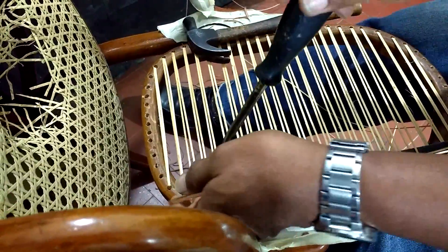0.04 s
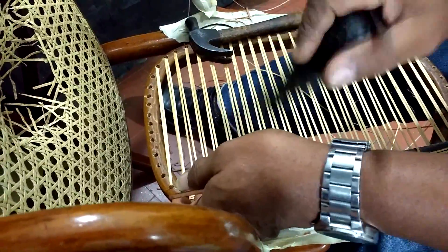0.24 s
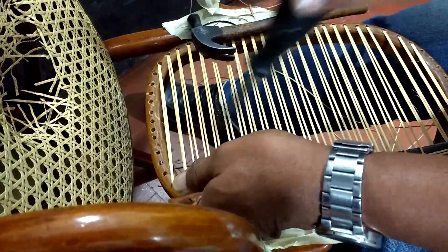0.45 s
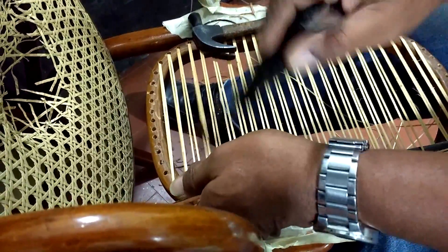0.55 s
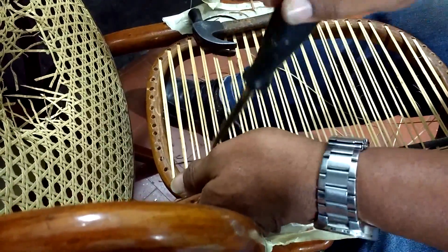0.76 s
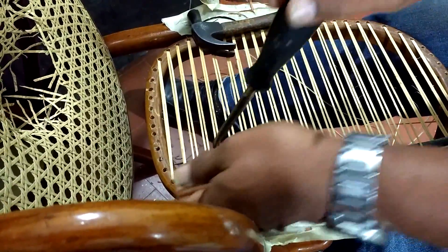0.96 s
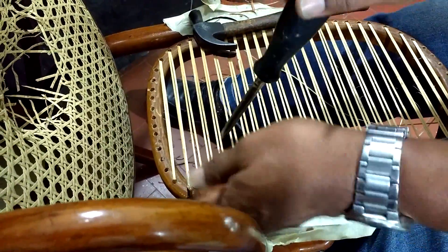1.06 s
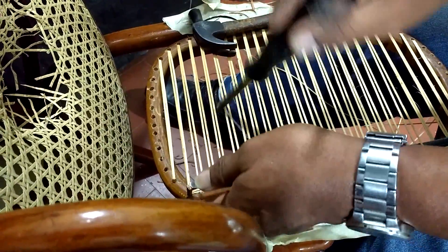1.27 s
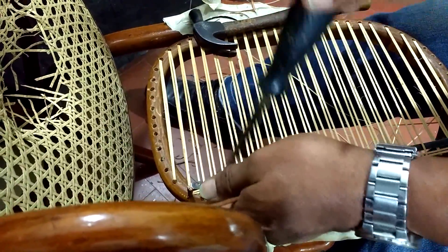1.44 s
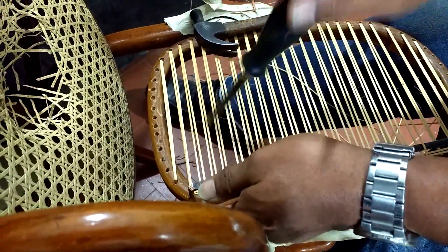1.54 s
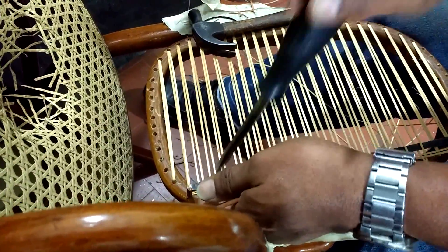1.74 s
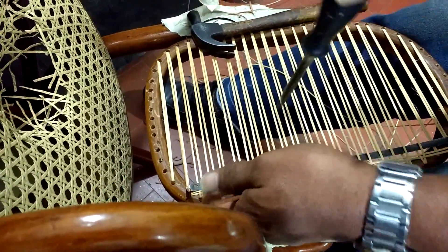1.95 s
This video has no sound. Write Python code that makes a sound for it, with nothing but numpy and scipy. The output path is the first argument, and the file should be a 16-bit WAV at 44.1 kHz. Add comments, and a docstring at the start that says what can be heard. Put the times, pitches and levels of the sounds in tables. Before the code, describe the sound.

Four close, sharp screwdriver jabs crack against a wooden cane chair in a small room.

```python
"""Screwdriver jabs on a cane chair

A screwdriver hits a wooden chair frame four times, close by in a small room. Each jab grazes
the cane, cracks on the wood, rings the tool briefly and sets the frame thudding. Cane strands
rustle between jabs over a low background with a faint hum. The stereo sound is wide and hollow."""
import sys
import numpy as np
from scipy import signal
from scipy.fft import rfft, irfft, next_fast_len
from scipy.io import wavfile
from scipy.ndimage import uniform_filter1d

SR = 44100
rng = np.random.default_rng(int(sys.argv[2]) if len(sys.argv) > 2 else 0)


def master_out(mix):
    """Clip the mix to full scale and print it as 16-bit PCM to the path in sys.argv[1]."""
    frames = np.transpose(np.atleast_2d(mix))
    ceiling = np.clip(frames, -1, 1)
    pcm = np.round(ceiling * 32767).astype(np.int16)
    wavfile.write(sys.argv[1], SR, pcm)


N = 88200


def amp(db):
    """Turn decibels into a number to multiply by."""
    return 10 ** (np.asarray(db) / 20)


def unit(x):
    """Scale a signal to an average strength (rms) of 1."""
    return x / np.sqrt(np.mean(x ** 2))


def curve(points, size):
    """Join (frequency, value) points into a line across the whole spectrum."""
    hz, value = np.array(points).T
    return np.interp(np.log(np.fft.rfftfreq(size, 1 / SR) + 1), np.log(hz), value)


def colour(x, points, keep_power=True, size=4096):
    """Shape the tone along (f/Hz, level/dB) points; keep_power leaves white noise equally strong."""
    gain = amp(curve(points, size))
    cepstrum = irfft(np.log(unit(gain) if keep_power else gain))
    cepstrum[1:size // 2] *= 2  # fold it so the filter never sounds ahead of its input
    cepstrum[size // 2 + 1:] = 0
    response = irfft(np.exp(rfft(cepstrum)))[:size // 2]
    return signal.fftconvolve(x, response)[:len(x)]


def noise(size=N):
    """White noise: all frequencies equally strong."""
    return rng.standard_normal(size)


def wander(rate):
    """A random drift that turns about `rate` times a second."""
    hold = int(SR / rate)
    steps = np.repeat(noise(N // hold + 1), hold)
    return unit(uniform_filter1d(steps, hold)[:N])


def decay(age, t60):
    """Silence before age 0, then a fade of 60 dB every t60 seconds."""
    return (age >= 0) * np.exp(-np.log(1000) * np.maximum(age, 0) / t60)


def ring(age, tones, scatter, tilt_db=0):
    """A struck object's fading tones, a little off pitch each time; tilt_db is per octave."""
    out = np.zeros(len(age))
    middle_hz = tones[len(tones) // 2][0]
    for k, (hz, db, t60) in enumerate(tones):
        detune = 1 + scatter * rng.standard_normal()
        level = amp(db + tilt_db * np.log2(hz / middle_hz))
        out += (-1) ** k * level * decay(age, t60) * np.sin(2 * np.pi * hz * detune * age)
    return out


# How much the two sides differ: f/Hz, level/dB
WIDTH = [(50, -6.5), (150, -8), (400, -3), (1200, -13.5), (2000, -4), (2500, -23), (3200, 2), (5000, -8),
         (15000, -2.5)]
def stereo_noise(tone, envelope=1, size=N):
    """One noise shared by both sides, plus another added left and subtracted right."""
    shared, different = (colour(noise(size) * envelope, tone) for _ in range(2))
    return shared + np.array([[1], [-1]]) * colour(different, WIDTH, keep_power=False)


# Tone of the hiss: f/Hz, level/dB
HISS_TONE = [(200, -11), (1500, -0.5), (2500, -12), (5000, -11.5), (14000, -9.5), (16000, -32.5)]
def hiss(level_db=-77.5):
    """A faint, steady microphone hiss."""
    return amp(level_db) * stereo_noise(HISS_TONE)


# Tone of the distant noise: f/Hz, level/dB
BACKGROUND_TONE = [(25, -23.5), (60, -20), (115, -6.5), (180, -8), (260, -2.5), (320, -11.5), (450, -7),
                   (800, -12), (1600, -20.5), (2300, -33), (3300, -31), (5000, -33), (9000, -35.5),
                   (14000, -41), (16000, -51)]
# Its loudness over time: t/s, level/dB
BACKGROUND_LEVEL = [(0, -45), (0.2, -44.5), (0.33, -46), (0.37, -54.5), (0.52, -62), (0.62, -58.5),
                    (0.8, -58), (1.35, -52.5), (1.56, -54.5), (1.85, -55.5), (2.0, -55)]
def background(t, flicker_db=1.45):
    """A low wash of distant noise, loudest before the first jab."""
    level_db = np.interp(t, *np.array(BACKGROUND_LEVEL).T) + flicker_db * wander(25.2)
    return amp(level_db) * stereo_noise(BACKGROUND_TONE)


# Short hums: start t/s, end t/s, start f/Hz, end f/Hz, level/dB
HUM_NOTES = [(0.04, 0.331, 276, 240.5, -50.5), (0.78, 1.15, 265, 263.5, -54),
             (1.76, 1.896, 246, 241, -53.5), (1.874, 2.05, 418, 431, -57.5)]
def hums(t, fade_s=0.052, waver=0.011):
    """A faint low tone comes and goes, wavering in pitch."""
    out = np.zeros(N)
    for start, end, from_hz, to_hz, db in HUM_NOTES:
        hz = np.interp(t, [start, end], [from_hz, to_hz]) * (1 + waver * wander(45))
        fade = np.clip(np.minimum(t - start, end - t) / fade_s, 0, 1)
        out += amp(db) * fade * np.sqrt(2) * np.sin(2 * np.pi * np.cumsum(hz) / SR)
    return out


# Rustles of the cane: middle t/s, length t/s, level/dB
CANE_RUSTLES = [(0.218, 0.11, -51), (0.317, .035, -41), (0.634, .02, -60), (0.997, 0.047, -67),
                (1.189, .03, -66), (1.284, .06, -62), (1.66, .04, -56.5)]
# Their tone: f/Hz, level/dB
CANE_TONE = [(500, 5), (2000, -10.5), (3200, -11), (4100, 1.5), (5200, -18.5), (9000, -17), (15000, -22)]
def cane(t, grain_db=3):
    """Strands slide over each other in short grainy rustles."""
    swells = sum(amp(db) * np.exp(-2 * np.minimum(((t - when) / length) ** 2, 20))
                 for when, length, db in CANE_RUSTLES)
    grain = unit(amp(grain_db * wander(400)))
    return stereo_noise(CANE_TONE, grain * swells)


# Tone of the echoes: f/Hz, level/dB
ECHO_TONE = [(60, -6), (150, -18), (400, 2.5), (800, 9.5), (1300, 2.5), (1900, -2), (2600, -6), (3600, 4.5),
             (5000, -2.5), (9000, 0), (14000, -12.5), (16000, 0)]
# Which way they lean: f/Hz, left minus right level/dB
ECHO_LEAN = [(100, 4.5), (1000, -0.5), (3500, 0), (4500, -9.5), (7000, -2), (14000, -9.5)]
def room(x, length_s=0.45, rise_s=0.015, early_db=-8.5, late_db=-11.5):
    """Quick echoes off the floor and chair, then the small room's longer fade."""
    t = np.arange(int(length_s * SR)) / SR
    rise = 1 - np.exp(-t / rise_s)
    early = amp(early_db) * unit(rise * decay(t, t60=0.078))
    late = amp(late_db) * unit(rise * decay(t, t60=0.35))
    echoes = stereo_noise(ECHO_TONE, np.hypot(early, late) / np.sqrt(len(t)), len(t))
    sides = []
    for side, sign in zip(echoes, (1, -1)):
        lean = [(hz, sign * db / 2) for hz, db in ECHO_LEAN]
        sides.append(signal.fftconvolve(x, colour(side, lean, keep_power=False))[:N])
    return np.array(sides)


# Tone of the loose joints: f/Hz, level/dB
JOINT_TONE = [(200, -39.5), (500, -11), (800, -3), (1200, -2.5), (1700, -5), (2300, 5.5), (5000, -32.5)]
def joint_clatter(age, rebound_s=0.04):
    """Loose joints clatter at the blow, and again as the chair rocks back once."""
    rocking = decay(age, t60=0.098) + amp(-12) * decay(age - rebound_s, t60=0.05)
    return colour(noise(len(age)) * rocking, JOINT_TONE)


# Ringing tones of the frame: f/Hz, level/dB, fade t/s
FRAME_TONES = [(114.3, -11, 0.34), (128.8, -8.5, 0.26), (168, -12, 0.32), (187.3, -1.5, 0.24),
               (233.7, -2, 0.2), (282, 2.5, .13), (317.7, 3.5, .15), (350, -0.5, 0.056),
               (409.8, -12.5, 0.2), (625, -17, .08), (789, -12.5, 0.12), (857, -3.5, 0.042),
               (896, -3, 0.04), (1170, -9.5, 0.099)]
def frame_thud(age, tilt_db, rise_s=0.0072, sharp=0.07, settle_s=0.013):
    """The thud swells just after the hit; the pressed frame starts high and sags to pitch."""
    elapsed = np.maximum(age, 0)
    swell = 1 - np.exp(-(elapsed / rise_s) ** 2)
    head_start = sharp * settle_s * (1 - np.exp(-elapsed / settle_s))
    return swell * ring(age + head_start, FRAME_TONES, scatter=0.006, tilt_db=tilt_db)


# Ringing tones of the tool on the wood: f/Hz, level/dB, fade t/s
TOOL_TONES = [(1320, -21, 0.035), (1740, -14, 0.015), (2240, -24.5, 0.045), (2636, -4.5, 0.016),
              (3238, -11.5, 0.022), (3670, -14.5, 0.017), (4220, -2, 0.013), (4580, -5.5, 0.016),
              (7200, -27, .02), (10500, -31, .015), (11700, -28.5, 0.005), (13000, -29.5, .015)]
def tool_ring(age):
    """The screwdriver's shaft rings briefly as it lands."""
    return ring(age, TOOL_TONES, scatter=0.0031)


# Tone of the crack: f/Hz, level/dB
CRACK_TONE = [(60, -14.5), (250, -0.5), (700, -2), (1300, -0.5), (1900, -0.5), (2600, -8), (3500, -1.5),
              (5300, -4.5), (6800, 0), (8300, -6.5), (12000, 1), (14500, -3.5), (16000, -27)]
def tip_crack(age, t60, slap_db, graze_s=0.0014, slap_after_s=0.019):
    """The tip brushes the cane, snaps and cracks on the wood, and the strands slap back."""
    graze = amp(-10.5) * (age < 0) * np.exp(-np.abs(age) / graze_s)
    snap = amp(-21) * decay(age, t60=0.0026)
    slap = amp(slap_db - 23) * decay(age - slap_after_s, t60=0.039)
    contact = amp(-15) * (graze + decay(age, t60) + slap) + snap
    return colour(noise(len(age)) * contact, CRACK_TONE)


# The jabs: t/s, crack level/dB, crack fade t/s, then a boost or cut in level/dB for each of:
# clack, bite, tick, sizzle, tool, frame, frame tilt (per octave), cane slap, room, clatter
JABS = [(0.3355, 0.5, 0.015, -7, -3, -3.5, 4, 2.5, -3, 1, 3, -5.5, -1),
        (0.6464, -6, 0.038, -3.5, -2.5, -0.5, 1, -11.5, -6, -3, -2, -2.5, 3),
        (1.3972, -4.5, 0.03, 3.5, -1, 1.5, 3, -1.5, 3, 1, 5, -0.5, 2),
        (1.6945, -0.5, 0.02, -5, -7.5, -3, -1.5, -5.5, 2.5, 2.5, -4, -1.5, -8)]
def jabs(t, length_s=0.25, shaft_echo_db=-11.5):
    """Each jab sounds the wood and the tool together, and the room answers."""
    direct, to_room = np.zeros(N), np.zeros(N)
    for (start, crack_db, crack_t60, clack_db, bite_db, tick_db, sizzle_db,
         tool_db, frame_db, tilt_db, slap_db, room_db, clatter_db) in JABS:
        span = int(round(start, 2) * SR) + np.arange(-SR // 50, int(length_s * SR))
        age = t[span] - start
        crack = amp(crack_db) * tip_crack(age, crack_t60, slap_db)
        tool = amp(tool_db - 11.5) * tool_ring(age)
        thud = amp(frame_db - 30) * frame_thud(age, tilt_db)
        clatter = amp(clatter_db - 32.5) * joint_clatter(age)
        # where the tip lands changes the tone: f/Hz, level/dB
        spot = [(500, 0.0064), (1100, clack_db), (2200, 0.0046), (3300, bite_db),
                (4500, tick_db), (6000, 0), (11500, 0), (14200, sizzle_db)]
        wood = colour(crack, spot, keep_power=False) + thud + clatter
        shaft = colour(tool, spot, keep_power=False)
        direct[span] += wood + shaft
        # the thin shaft is heard close by and hardly stirs the room
        to_room[span] += amp(room_db) * (wood + amp(shaft_echo_db) * shaft)
    return direct + room(to_room)


def scene():
    """Jabs, cane and background sounds together."""
    t = np.arange(N) / SR
    return jabs(t) + cane(t) + background(t) + hums(t) + hiss()


# Tone of the widening: f/Hz, level/dB
WIDENING_TONE = [(1500, -1), (1900, 6), (2500, 11.5), (3100, 7), (3600, 2.5), (4200, -0.5), (4900, 5.5),
                 (5500, 5), (6200, -3), (7500, 0.5), (8500, -1)]
# Which way the sound leans: f/Hz, left minus right level/dB
STEREO_LEAN = [(50, -4), (130, -6), (320, -8), (520, 0), (3500, 0), (4500, 5), (6000, 1), (10000, 0),
               (12000, -3), (14500, -5)]
# How far the right side's wave lags: f/Hz, phase/rad
RIGHT_LAG = [(30, .8), (250, .8), (550, 0), (1550, -.1), (1720, .5), (1870, 2.5), (2450, 3.14), (3100, 3.9),
             (3400, 5.8), (4150, 6.4), (4450, 8.6), (4950, 9.45), (5550, 9.9), (6100, 12.4), (6900, 13.3),
             (7550, 15.7), (8600, 18.5), (10100, 21.4), (11400, 24.4), (13000, 28.2), (15600, 35)]
def record(dry, top_hz=16000):
    """Stereo widening brightens the sound and delays the right side's treble; the bass leans right."""
    size = next_fast_len(N + SR // 20)
    lean = amp(curve(STEREO_LEAN, size))
    lag = np.exp(-1j * curve(RIGHT_LAG, size))
    same_power = np.sqrt(2 / (1 + lean ** 2))
    sides = np.array([lean, lag]) * same_power * amp(curve(WIDENING_TONE, size))
    wide = irfft(rfft(dry, size) * sides, size)[:, :N]
    treble_cut = signal.ellip(8, .2, 70, top_hz, fs=SR, output="sos")
    return signal.sosfilt(treble_cut, np.clip(wide, -1, 1))


dry = scene()
out = record(dry)
master_out(out)
```